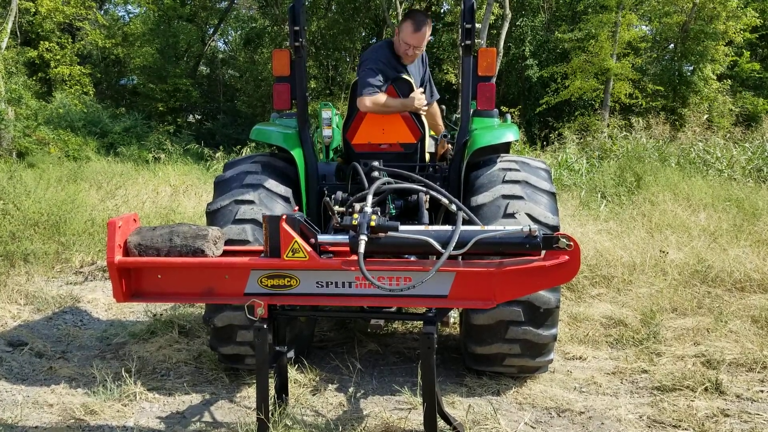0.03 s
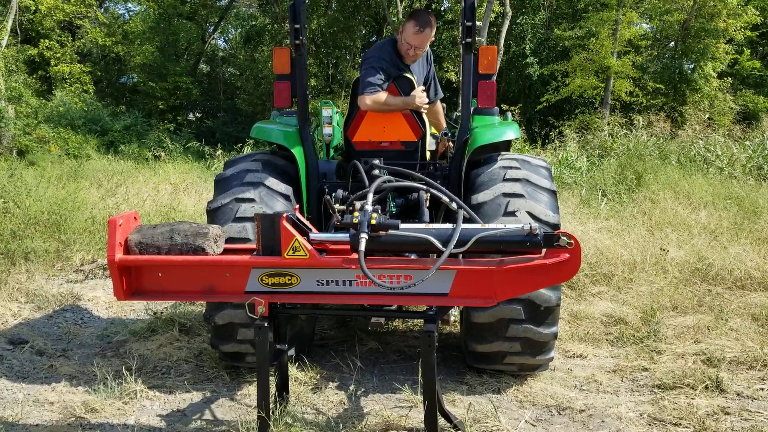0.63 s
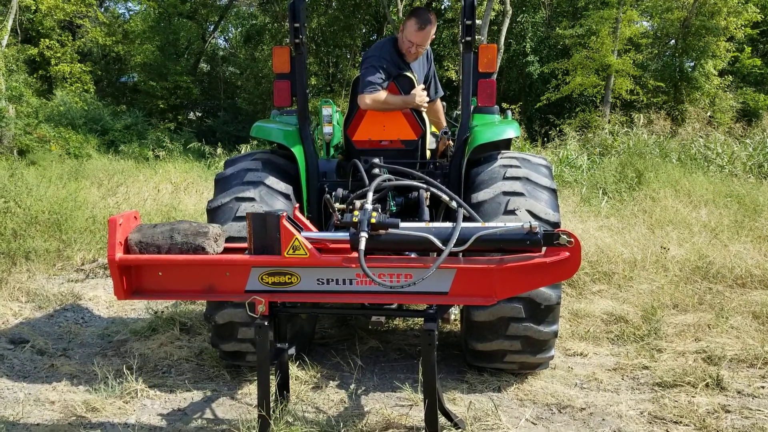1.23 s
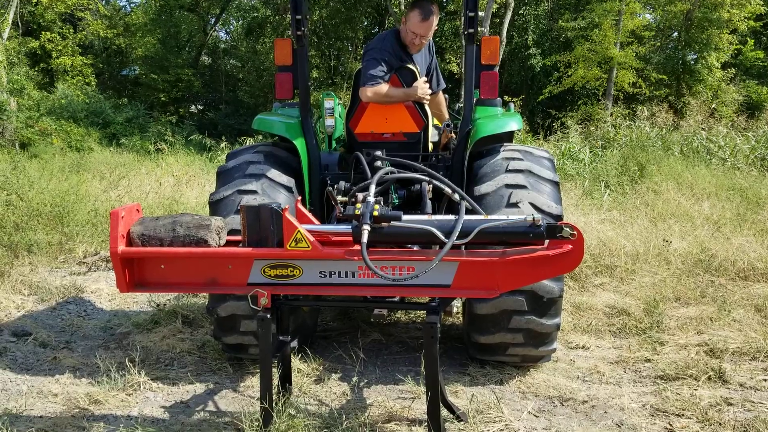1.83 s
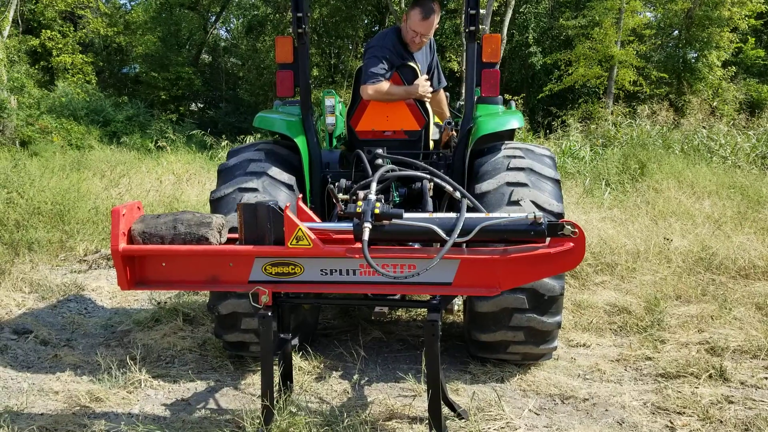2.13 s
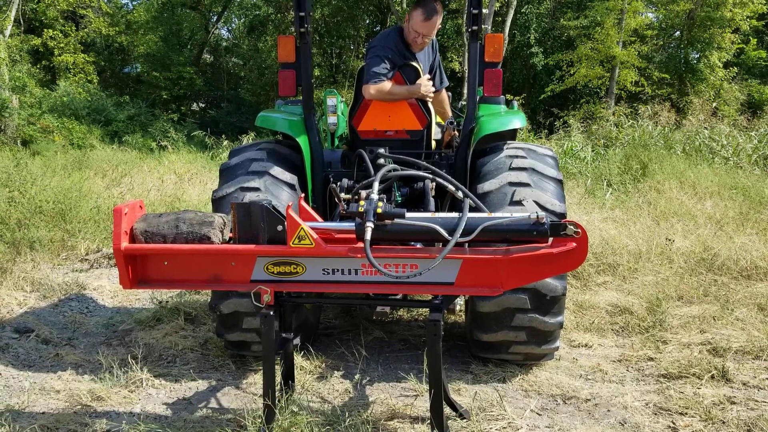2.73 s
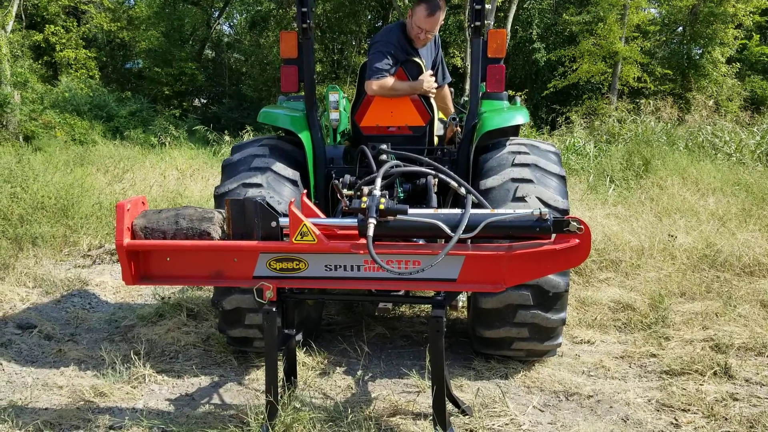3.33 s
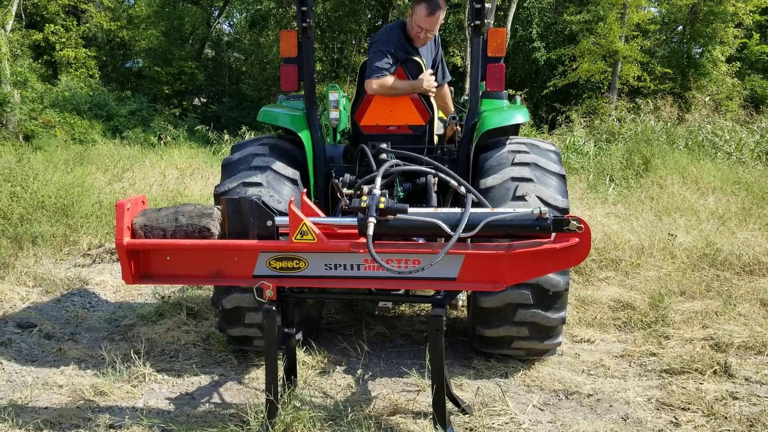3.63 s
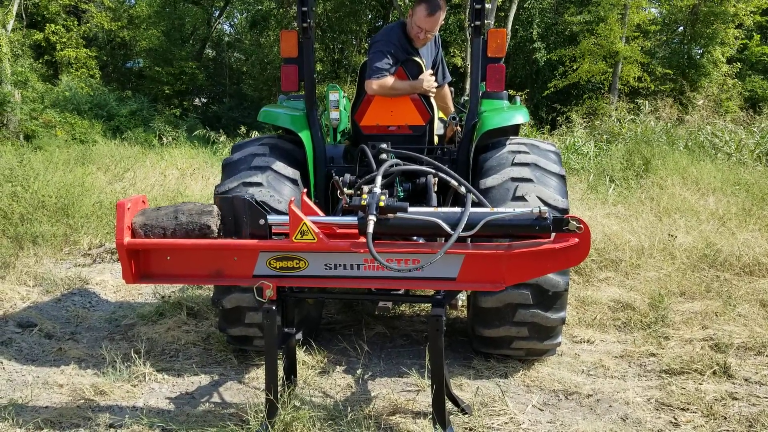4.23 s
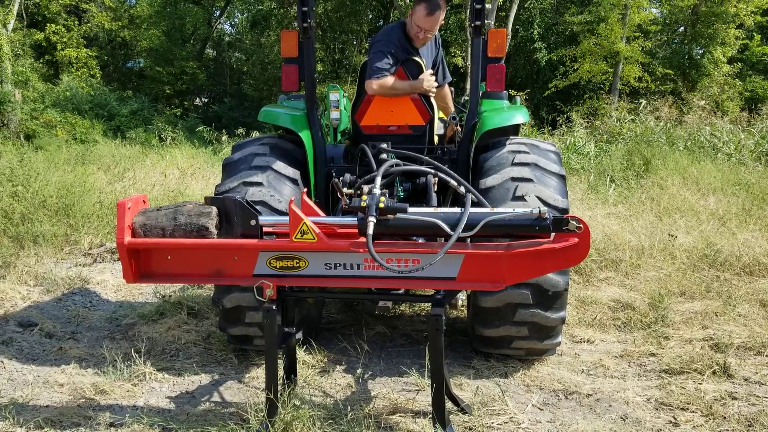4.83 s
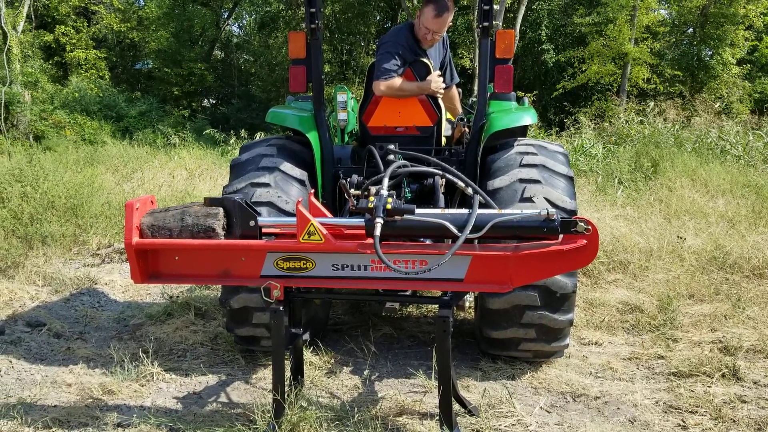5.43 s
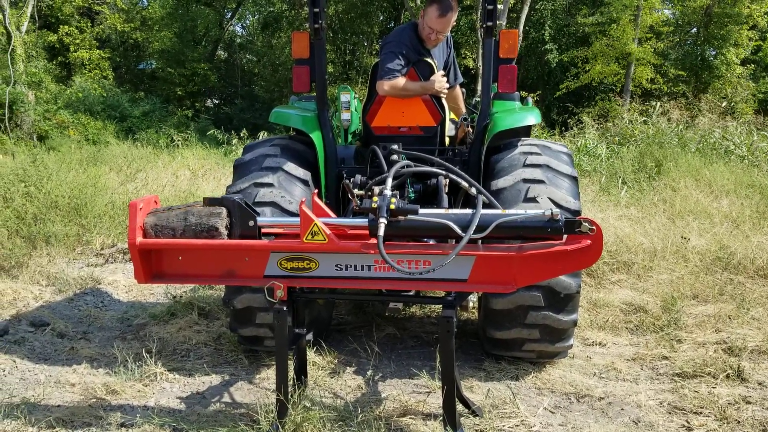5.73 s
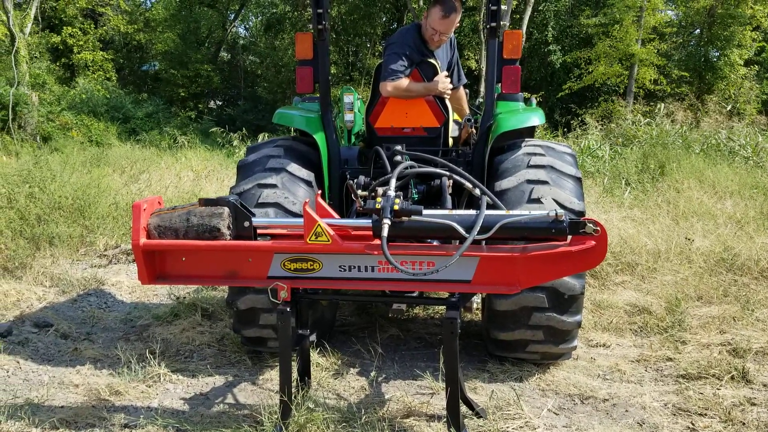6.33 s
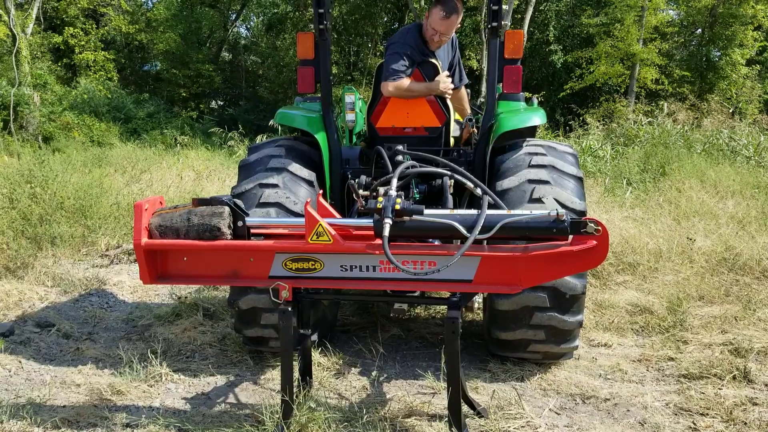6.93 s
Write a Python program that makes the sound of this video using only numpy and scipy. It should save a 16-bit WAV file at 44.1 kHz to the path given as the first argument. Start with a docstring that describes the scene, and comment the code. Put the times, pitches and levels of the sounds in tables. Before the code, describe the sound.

A diesel tractor runs steadily in an open meadow, with a low drone, a fast clatter and a pulsing metallic ring. About four seconds in, a log in a splitter creaks, cracks open sharply a little to the left and snaps a few last fibres. The engine then runs slightly quieter for a while. A faint, high insect buzz comes and goes, and a breeze brushes the microphone near the end.

```python
"""In a dry meadow, a four-cylinder diesel tractor runs steadily and drives a hydraulic log splitter.
Its exhaust drones, its valves and injectors clatter, and a steel part sings once in every engine cycle.
The wedge presses into a log, which creaks, tears open and snaps a few last fibres.
A katydid (a bush cricket) ticks and buzzes with its wings, and a breeze brushes the microphone."""
import sys
import numpy as np
from scipy import signal
from scipy.fft import rfft, irfft
from scipy.io import wavfile
from scipy.ndimage import uniform_filter1d

SR = 44100
rng = np.random.default_rng(int(sys.argv[2]) if len(sys.argv) > 2 else 0)


def file_out(sig):
    """Save sig as 16-bit WAV at sys.argv[1]."""
    # one column per channel
    cols = np.atleast_2d(sig).T
    # limit, then scale
    lim = np.clip(cols, -1, 1)
    pcm = np.round(lim * 32767).astype(np.int16)
    wavfile.write(sys.argv[1], SR, pcm)


N = 317520
CYCLE_HZ = 13.677  # engine cycles per second; each cylinder fires once in a cycle


def tractor():
    """The engine's governor holds its speed almost constant; its rhythms all follow the same cycle."""
    cycle = CYCLE_HZ * np.arange(N) / SR + .0005 * drift(2) + .00012 * drift(40)  # cycles run so far
    knocks = clatter(cycle, decay_s=.006, steady=.4, repeat_share=.68, uneven_db=.6)
    out = drone(cycle, waver_db=0.5, belt_slip_s=0.00027, firing_share=0.0411) * pan(0.12)
    out += from_db(-32) * exhaust_rumble()
    out += from_db(-31) * knocks
    out += from_db(-0.86) * steel_ring(cycle, sag_hz=20.5, waver_db=0.7) * pan(1.9)
    out += from_db(-45.5) * engine_hiss()
    out += from_db(-52) * chuff(cycle)
    # once the log gives way, the tractor runs a little quieter for a while
    return out * from_db(-1.63 * envelope(start_s=4.14, rise_s=0.33, hold_s=2.03, fall_s=.55))


def drone(cycle, waver_db, belt_slip_s, firing_share):
    """Exhaust, block and gears hum in step with the engine; the belt of the fan and pump slips a little."""
    # Exhaust and engine block tones. Each row: multiple of the cycle rate, level in dB.
    engine_tones = [(3, -48), (4, -30.5), (5, -50), (8, -33.5), (9, -43.5), (10, -43.5), (11, -42),
                    (12, -40.5), (13, -39), (14, -37), (15, -59), (16, -42.5), (17, -47.5), (18, -45.5),
                    (19, -54), (20, -38), (22, -52), (28, -44.5), (29, -48.5), (32, -45.5)]
    # The whine of the gears. Each row: multiple of the cycle rate, level in dB.
    gear_tones = [(52, -46), (53, -48.5), (56, -49), (57, -48), (60, -48), (64, -50), (84, -46), (95, -46),
                  (104, -46), (119, -42), (136, -46), (172, -50)]
    # Fan and pump tones. Each row: pitch in Hz, level in dB.
    belt_tones = [(167.0, -41), (334.0, -47), (339.4, -40), (678.8, -42.5)]
    out = 0
    for multiple, db in engine_tones + gear_tones:
        # tones 4 and 8 peak together: one exhaust pulse for each cylinder
        offset = rng.random() * (multiple not in (4, 8))
        phase = multiple * (cycle - firing_share) + offset
        out += from_db(db + waver_db * drift(7.2)) * np.cos(2 * np.pi * phase)
    belt_s = cycle / CYCLE_HZ + belt_slip_s * drift(2)
    for hz, db in belt_tones:
        out += from_db(db + 0.64 * drift(3.1)) * np.sin(2 * np.pi * (hz * belt_s + rng.random()))
    return np.sqrt(2) * out


def exhaust_rumble():
    """The exhaust adds a low, steady rumble."""
    # The rumble's tone colour. Each row: frequency in Hz, relative level in dB.
    rumble_spectrum = [(20, -30), (35, -10), (55, -2), (80, -2.5), (120, 0.5), (175, -1), (230, -5.5),
                       (270, -1.5), (305, -10.5), (360, -8), (440, -11.5), (520, -15.5), (800, -38)]
    return noise(rumble_spectrum, left_db=-0.6)


def clatter(cycle, decay_s, steady, repeat_share, uneven_db):
    """Each cylinder knocks as it fires, then its injector and valves follow with short bursts."""
    # The cylinders in firing order. Each row: relative level in dB, brightness in dB per octave.
    cylinders = [(-0.5, -0.7), (0.5, 1.4), (1, 1.4), (0.24, -1)]
    # One cylinder's knocks. Each row: delay in cycles, relative level in dB, brightness in dB per octave.
    knocks = [(0, 1.5, -.7), (.043, -1.2, .3), (.1, -.8, 0), (.14, -2.3, .6), (.21, -3, .3)]
    # The clatter's tone colour. Each row: frequency in Hz, relative level in dB.
    clatter_spectrum = [(300, -8), (520, -18), (640, 3), (800, 0.5), (1070, -6), (1300, -5), (1620, -1.5),
                        (1770, -5.5), (2050, -1.5), (2400, -6), (2900, -8.5), (3300, -15.5), (4600, -21.5),
                        (8000, -24)]
    # part of the ringing is the same in every cycle, part is new
    period = round(SR / CYCLE_HZ)
    one_cycle = rms_one(irfft(np.exp(2j * np.pi * rng.random((2, period // 2 + 1))), period))
    repeated = one_cycle[:, (cycle % 1 * period).astype(int)]
    ringing = np.sqrt(repeat_share) * repeated + np.sqrt(1 - repeat_share) * rng.standard_normal((2, N))
    firings = [(.175 + k / len(cylinders), db, bright) for k, (db, bright) in enumerate(cylinders)]
    share, db, bright = np.transpose([np.add(firing, knock) for firing in firings for knock in knocks])
    knock_cycles = np.arange(int(cycle[-1]) + 1)[:, None] + share % 1
    knock_samples = np.searchsorted(cycle, knock_cycles).ravel()
    layers = []
    for octave, (low_hz, high_hz) in enumerate([(250, 1000), (1000, 2100), (2100, 9000)], -1):
        force_db = db + octave * bright + uneven_db * rng.standard_normal(knock_cycles.shape)
        power = np.bincount(knock_samples, from_db(force_db).ravel() ** 2, N + 1)[:N]
        power = signal.lfilter([1], [1, -np.exp(-2 / (SR * decay_s))], power)  # each knock dies away
        power = np.abs(uniform_filter1d(power, size=130))  # the block takes about 3 ms to answer
        layers.append(band(ringing, low_hz, high_hz) * rms_one(np.sqrt(power + steady ** 2)))
    dull, middle, sharp = layers
    return spread(colour(dull - middle + sharp, clatter_spectrum), left_db=3.0)


def steel_ring(cycle, sag_hz, waver_db):
    """A steel part sings once a cycle in three close tones, whose pitch sags while they are loud."""
    # The steel's tones. Each row: multiple of the cycle rate, relative level in dB.
    steel_tones = [(148, -37.5), (153, -46), (156, -34.6)]
    stages = np.cumsum([.09, .09, .15, .06])  # wait, rise, hold and drop, in cycles; then a fading tail
    swell_db = np.interp(cycle, stages, [-9.5, 0, 0, -5.5], period=1)
    swell = rms_one(from_db(swell_db + waver_db * drift(20)))
    sag = sag_hz * np.cumsum(swell - swell.mean()) / SR
    since_peak = cycle - .182  # the tones line up at this point of the cycle
    tones = sum(from_db(db) * np.cos(2 * np.pi * (multiple * since_peak - sag))
                for multiple, db in steel_tones)
    return np.sqrt(2) * swell * tones


def engine_hiss():
    """The running engine gives off a fine, steady hiss."""
    # The hiss's tone colour. Each row: frequency in Hz, relative level in dB.
    hiss_spectrum = [(1500, 5), (3500, 5), (5000, 4.5), (5500, -5), (7000, -4.5), (8200, 0), (9500, -13.5),
                     (12000, -1), (14300, -9), (15500, -4)]
    return noise(hiss_spectrum, left_db=9.0)


def chuff(cycle):
    """A thin hiss swells twice in the second half of each cycle."""
    early = 0.6 * np.exp(-((cycle % 1 - .51) / 0.066) ** 2)
    late = np.exp(-((cycle % 1 - 0.773) / 0.14) ** 2)
    hiss = band(rng.standard_normal((2, N)), 7300, 8030)
    return spread(hiss * (0.27 + early + late), left_db=3.0)


def log_cracks(broad_gain, thud_gain):
    """Bundles of fibres break in sharp bursts, each with a band of noise at its splinter's pitch."""
    # Each row: start in seconds, relative level in dB, pitch in Hz, seconds to fade by 60 dB.
    cracks = [(4.2335, -37, 9000, .012), (4.2447, -19, 6400, .008), (4.2559, -16.5, 2950, 0.019),
              (4.269, -24.5, 6000, 0.035), (4.2773, -24, 1990, .012), (4.284, -20, 6650, 0.031),
              (4.304, -23, 3000, 0.022), (4.333, -28.5, 7150, 0.018), (4.3619, -36, 6300, 0.031),
              (4.4532, -28, 6900, .018), (4.4605, -33, 6600, .015), (4.4841, -23, 7000, 0.017),
              (4.5258, -13, 14000, 0.0024), (4.528, -33, 8000, .04)]
    out, t = np.zeros((2, N)), np.arange(SR // 10) / SR
    for start, db, hz, fade_s in cracks:
        white = rng.standard_normal((2, len(t)))
        burst = rms_one(band(white, hz / 1.55, hz * 1.2))
        burst += broad_gain * rms_one(band(white, 1600, 21000))
        burst += thud_gain * rms_one(band(white, 740, 1340))
        at = round(start * SR)
        out[:, at:at + len(t)] += burst * from_db(db - 60 * t / fade_s)
    return from_left(out, delay_samples=6, scatter=0.88) * pan(5.0)


def log_tearing(snap_range_db, rise_db_per_s, fall_db_per_s):
    """Single fibres snap at random; they make the log ring and spit bright splinter noise."""
    # The wood strains, splits, loses its last strands and parts. Each row: start in seconds,
    # length in seconds, snaps per second, relative levels in dB of the log and of the splinters.
    tears = [(3.99, .25, 800, -40, -55), (4.255, .038, 9000, -26, -33.5), (4.33, 0.23, 1000, -44, -49),
             (4.61, .03, 1500, -45, -42.5)]
    # The log's own tones. Each row: pitch in Hz, relative level in dB, seconds to fade by 60 dB.
    log_tones = [(624, -1.5, 0.03), (820, 1, 0.021), (962, 1.5, 0.032), (1196, 1, .015), (1666, 2.5, 0.018),
                 (2570, 5, 0.0047), (3730, 3.5, 0.0054)]
    t = np.arange(N) / SR
    start, length, rate, wood_db, splinter_db = np.transpose(tears)[:, :, None]
    before_s, after_s = np.clip(start - t, 0, 1), np.clip(t - start - length, 0, 1)
    swell = from_db(-rise_db_per_s * before_s - fall_db_per_s * after_s)
    snaps_per_s = np.maximum((rate * swell).max(0), rate.min())
    snapping = rng.random(N) < snaps_per_s / SR
    strength = from_db(snap_range_db * np.minimum(rng.exponential(1, N) / 3, 1))
    snaps = snapping * strength / np.sqrt(snaps_per_s)
    body = sum(from_db(db) * ring(snaps * rng.standard_normal(N), hz, fade_s)
               for hz, db, fade_s in log_tones)
    splinters = band(snaps * rng.standard_normal((2, N)), 1900, 15000)
    body_gain = (from_db(wood_db) * swell).max(0)
    splinter_gain = (from_db(splinter_db) * swell).max(0)
    return body_gain * rms_one(body) * pan(3.2) + splinter_gain * spread(splinters, left_db=5.0)


def katydid(stroke_hz, pulse_depth, tick_rise_s, shrill_gain, swell_db, tire_db_per_s, edge_s):
    """Single wing strokes tick; a fast run of them makes a buzz that swells, tires and stops short. A fainter
    buzz of other insects sounds in the background for a while."""
    # The wing's tone colour. Each row: frequency in Hz, relative level in dB.
    wing_spectrum = [(8300, -39), (9300, -2.5), (10200, -3.5), (10900, 0.5), (11300, -5), (11700, -3),
                     (12300, 3.5), (12800, -2), (13900, -4), (14700, -7), (15300, -3)]
    # Each row: start, peak and end in seconds, level at the peak in dB, shrillest pitch in Hz. The second row
    # is the fainter buzz of other insects in the background.
    buzzes = [(0, 1.45, 1.6, -37.5, 11850), (2.2, 3.2, 3.55, -46.5, 11500), (3.9, 4.803, 5.81, -35, 11440),
              (6.3, 7.15, 7.37, -38.5, 10900)]
    # Single wing strokes. Each row: start in seconds, relative level in dB.
    ticks = [(.05, -39), (2.2753, -39), (2.3336, -37), (2.401, -34), (2.4853, -33), (2.6095, -35),
             (2.7437, -40), (2.8345, -37), (2.9607, -39), (3.0924, -39), (3.1817, -37), (3.269, -37),
             (3.5798, -42), (3.6447, -39), (3.7215, -36), (4.0218, -39), (6.015, -41), (6.105, -39)]
    t = np.arange(N) / SR
    strokes = np.cumsum(stroke_hz * (1 + .012 * drift(4.95))) / SR
    scrape, rasp = rng.standard_normal((2, 2, N))
    wing = rms_one(colour(scrape, wing_spectrum))
    buzz = 0
    for start, peak, end, db, hz in buzzes:
        level_db = db - swell_db * np.clip((peak - t) / (peak - start), 0, 1) ** 2
        level_db -= tire_db_per_s * np.maximum(t - peak, 0)
        tone = rms_one(wing + shrill_gain * rms_one(band(rasp, hz - 600, hz + 600)))
        buzz += tone * from_db(level_db) * envelope(start, edge_s, end - start - edge_s, edge_s)
    pulses = rms_one(np.exp(pulse_depth * np.cos(2 * np.pi * strokes)))
    tick_gain = sum(from_db(db + 1) * envelope(start, tick_rise_s, 0, tick_rise_s) for start, db in ticks)
    song = buzz * pulses + tick_gain * rms_one(band(scrape, 10400, 13400))
    return from_left(song, delay_samples=1, scatter=0.43) * pan(-.8)


def breeze(still_db, lumpy_db):
    """Air stirs unevenly at each side of the microphone on its own, and rumbles with every puff."""
    # Puffs of wind. Each row: start in seconds, seconds at full strength, dB above still air.
    puffs = [(2.05, .6, 7), (3.88, .08, 11), (6.68, .5, 19.5)]
    # The moving air's tone colour. Each row: frequency in Hz, relative level in dB.
    air_spectrum = [(20, -12), (50, 0), (90, -4), (200, -15), (500, -50)]
    puff_db = sum(db * envelope(start, 0.086, length, .15) for start, length, db in puffs)
    gain = from_db(still_db + puff_db + lumpy_db * drift(8))
    return gain * rms_one(colour(rng.standard_normal((2, N)), air_spectrum))


def from_db(db):
    """Turn decibels into a number to multiply by."""
    return 10 ** (np.asarray(db) / 20)


def rms_one(x):
    """Scale a signal so that its average power is 1."""
    return x / np.sqrt(np.mean(x ** 2) + 1e-20)


def drift(rate):
    """Wander about zero, gliding to a new random value `rate` times a second."""
    count = int(rate * N / SR) + 3
    return np.interp(np.arange(N) * rate / SR, np.arange(count), rng.standard_normal(count))


def envelope(start_s, rise_s, hold_s, fall_s):
    """Rise from 0 to 1, stay there, then fall back."""
    return np.interp(np.arange(N) / SR, start_s + np.cumsum([0, rise_s, hold_s, fall_s]), [0, 1, 1, 0])


def colour(x, spectrum):
    """Turn frequencies up or down, following rows of frequency in Hz and level in dB."""
    hz, db = np.transpose(spectrum)
    curve_db = np.interp(np.log(np.fft.rfftfreq(N, 1 / SR) + 1), np.log(hz), db)
    return irfft(rfft(x) * from_db(curve_db), N)


def band(x, low_hz, high_hz):
    """Keep the sound between two frequencies."""
    edges_hz = [low_hz, min(high_hz, SR / 2 - 1000)]
    return signal.sosfilt(signal.butter(2, edges_hz, "band", fs=SR, output="sos"), x)


def ring(clicks, hz, fade_s):
    """Each click starts a pure tone that fades by 60 dB in fade_s seconds."""
    decay, angle = from_db(-60 / (fade_s * SR)), 2 * np.pi * hz / SR
    return signal.lfilter([0, np.sin(angle)], [1, -2 * decay * np.cos(angle), decay ** 2], clicks + 1e-18)


def noise(spectrum, left_db):
    """Stereo noise with a given tone colour."""
    return spread(colour(rng.standard_normal((2, N)), spectrum), left_db)


def pan(left_db):
    """Two gains that make the left channel left_db louder than the right."""
    return from_db(np.array([[left_db], [-left_db]]) / 2)


def spread(pair, left_db):
    """Two unrelated signals become middle and side: narrow in the bass, wide in the treble."""
    # Stereo width. Each row: frequency in Hz, level of the side against the middle in dB.
    width = [(60, -32), (150, -40), (400, -13.5), (800, -19), (1400, -7), (2500, -3), (4000, 0), (8000, 0),
             (15000, 0)]
    mid, side = rms_one(pair)
    return (mid + colour(side, width) * [[1], [-1]]) * pan(left_db)


def from_left(pair, delay_samples, scatter):
    """A sound from the left reaches the right microphone a little later, with some scattered sound."""
    direct, scattered = pair
    return np.array([direct + scatter * scattered, np.roll(direct - scatter * scattered, delay_samples)])


def scene():
    """Tractor, splitting log, insect and breeze in the open air."""
    wood = from_db(-3) * log_cracks(broad_gain=1.25, thud_gain=.5)
    wood += from_db(0.5) * log_tearing(snap_range_db=6.6, rise_db_per_s=600, fall_db_per_s=327)
    insect = katydid(stroke_hz=125.4, pulse_depth=0.51, tick_rise_s=0.005, shrill_gain=0.64,
                     swell_db=17.5, tire_db_per_s=5, edge_s=0.025)
    return tractor() + wood + insect + breeze(still_db=-54.5, lumpy_db=2)


def record(dry):
    """Cut the deepest bass (below 22 Hz) and the highest treble (above 15900 Hz)."""
    low_cut = signal.sosfilt(signal.butter(2, 22, "high", fs=SR, output="sos"), dry)
    return signal.sosfilt(signal.ellip(10, .1, 80, 15900, fs=SR, output="sos"), low_cut)


dry = scene()
out = record(dry)
file_out(out)
```